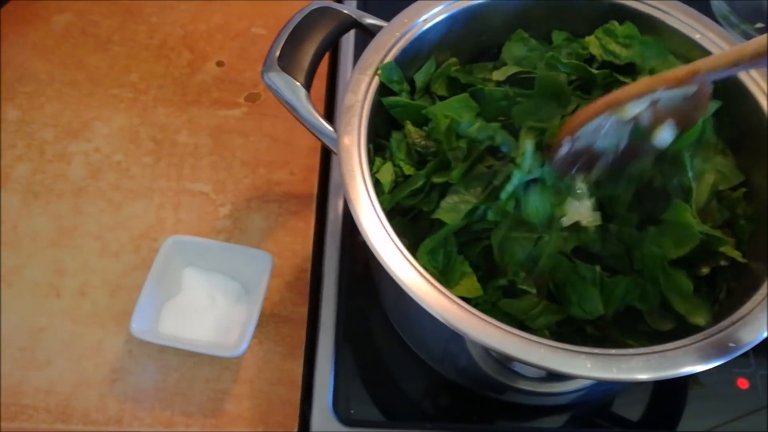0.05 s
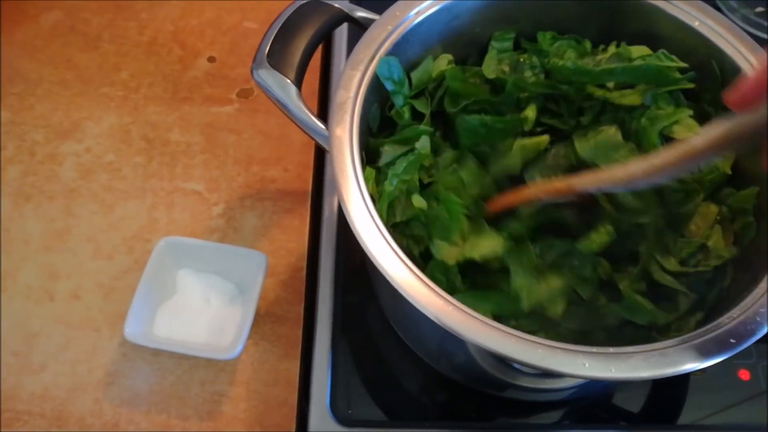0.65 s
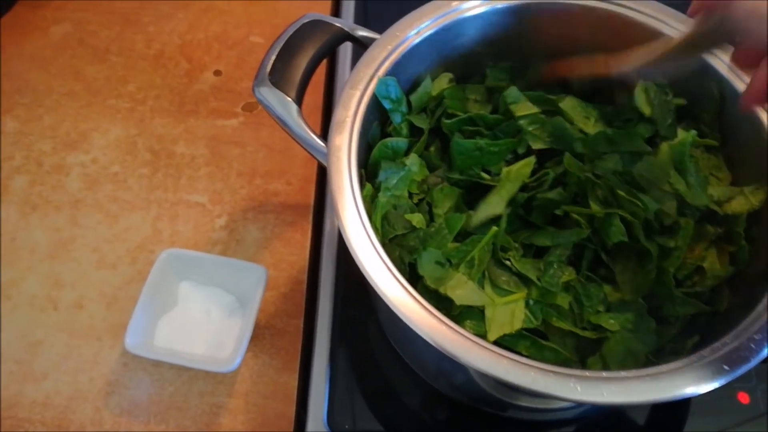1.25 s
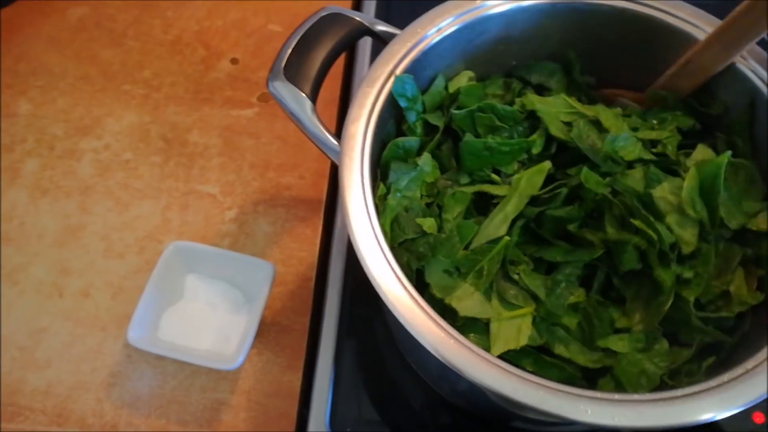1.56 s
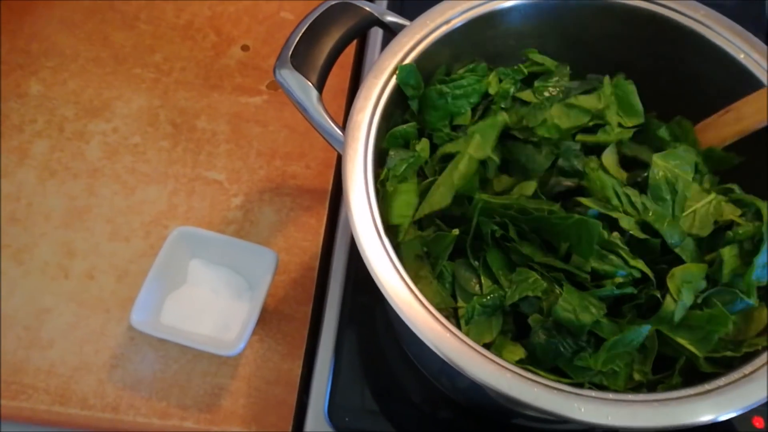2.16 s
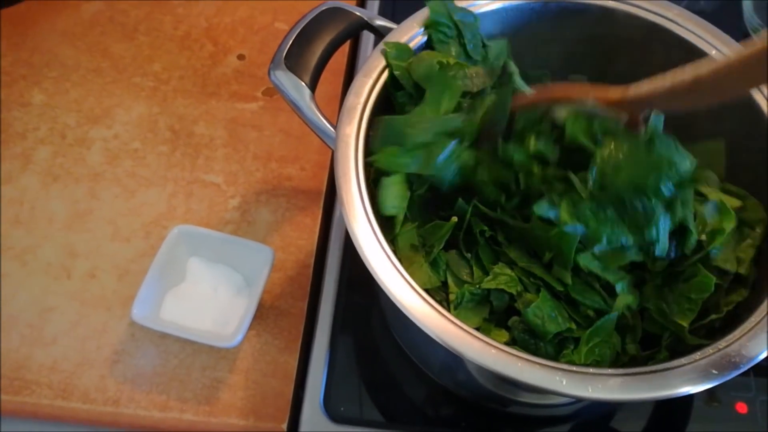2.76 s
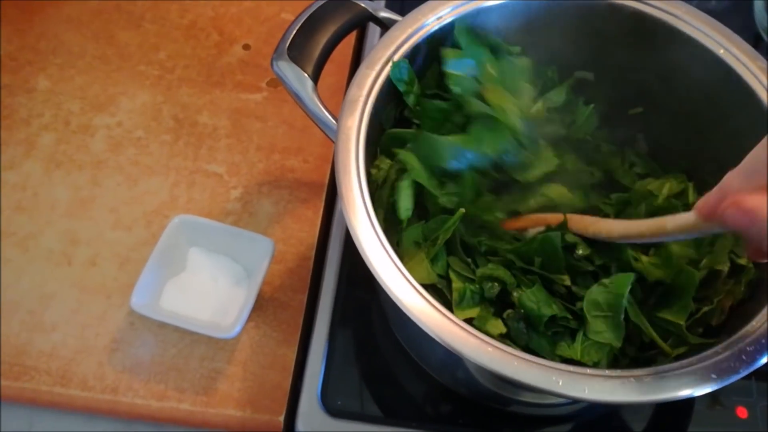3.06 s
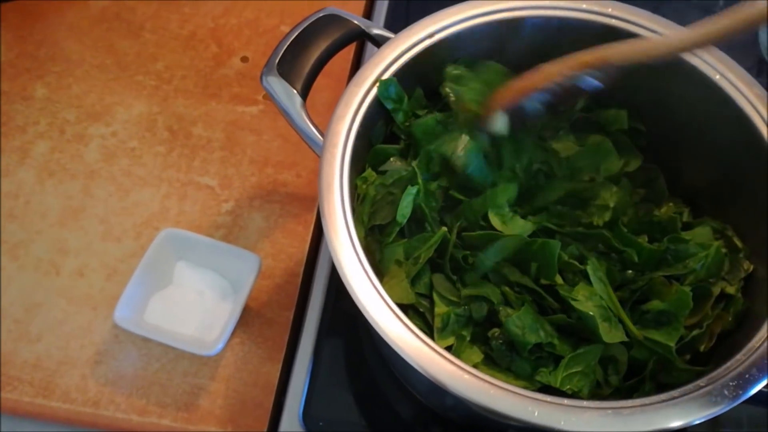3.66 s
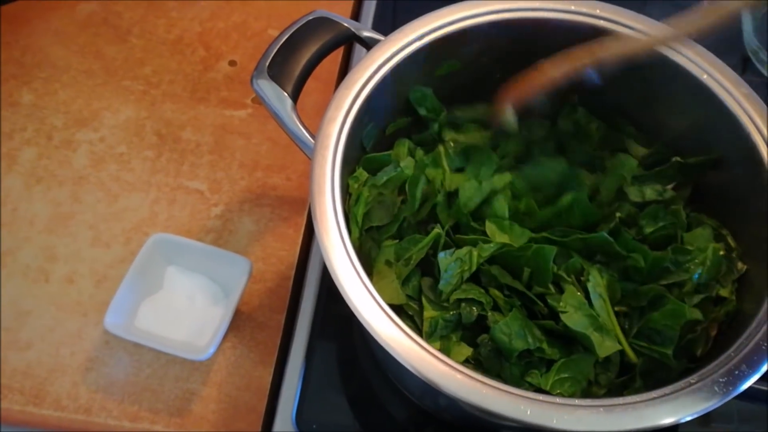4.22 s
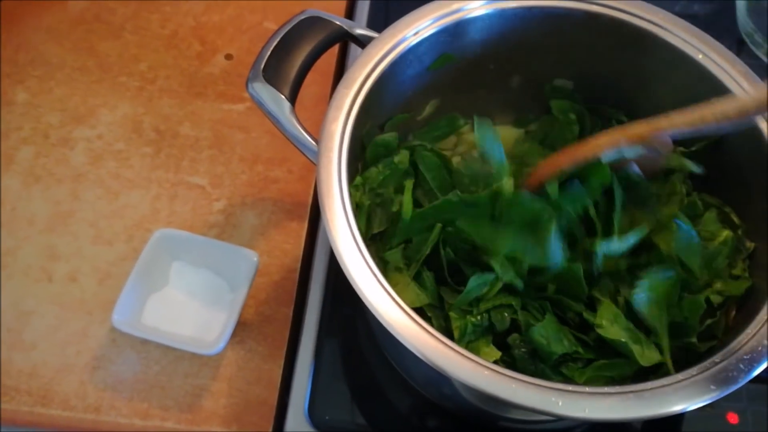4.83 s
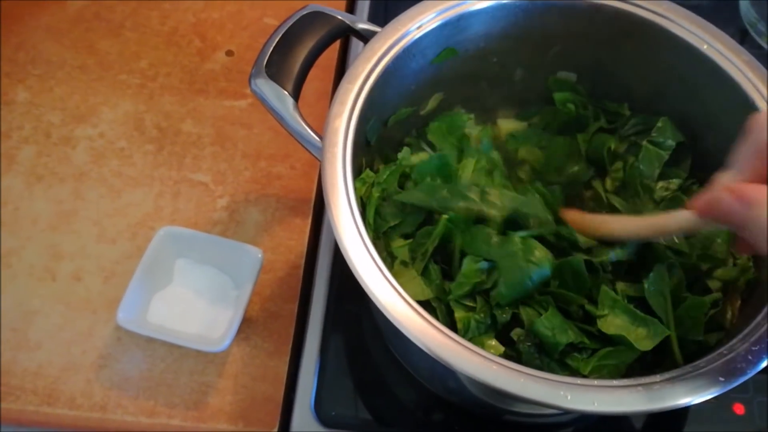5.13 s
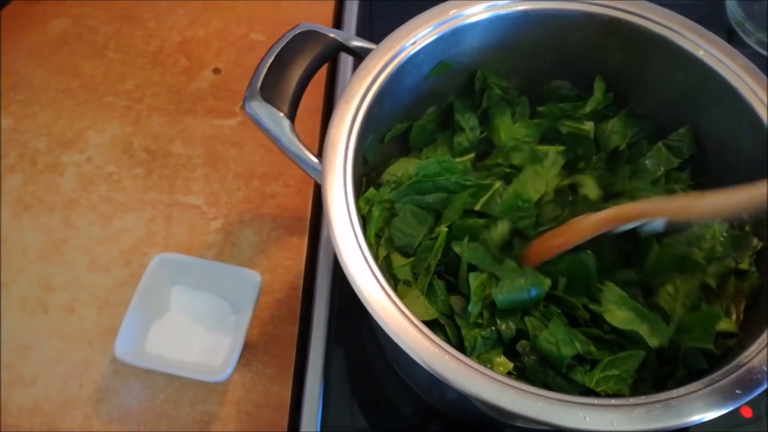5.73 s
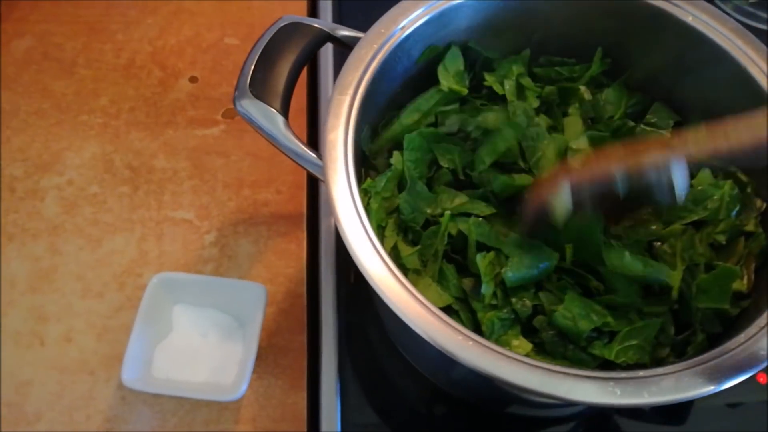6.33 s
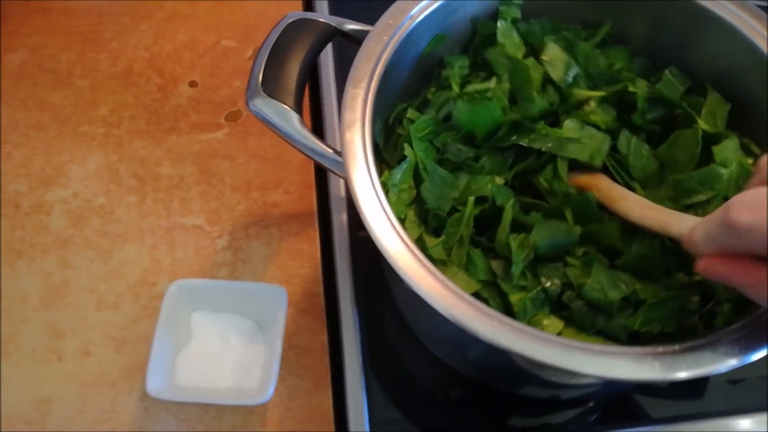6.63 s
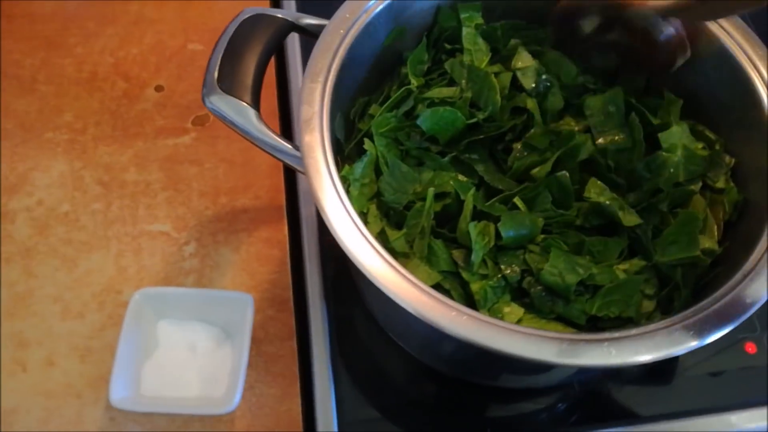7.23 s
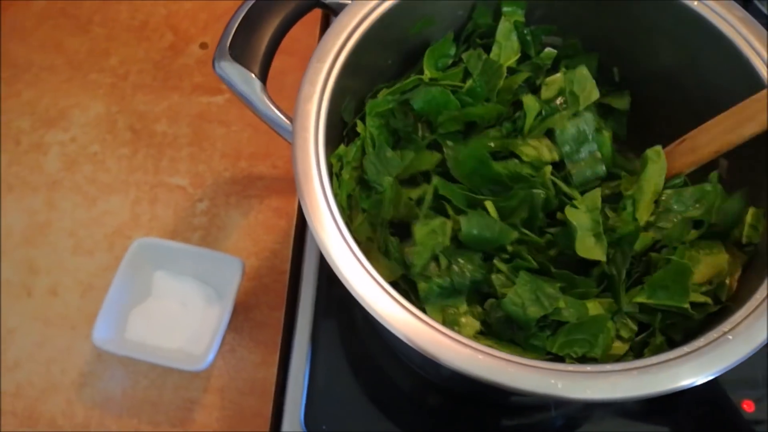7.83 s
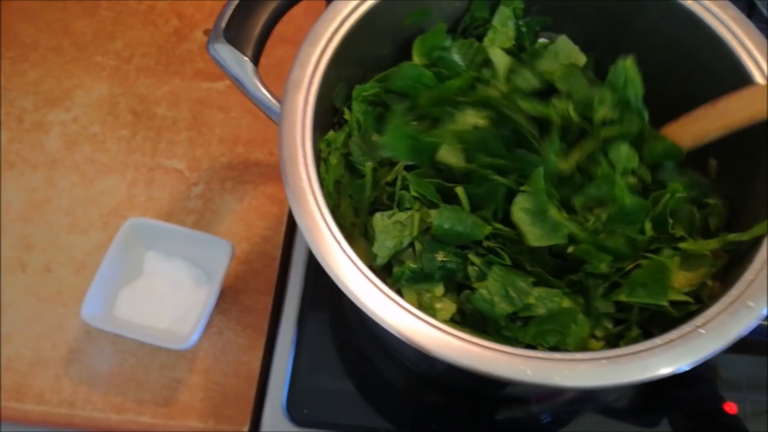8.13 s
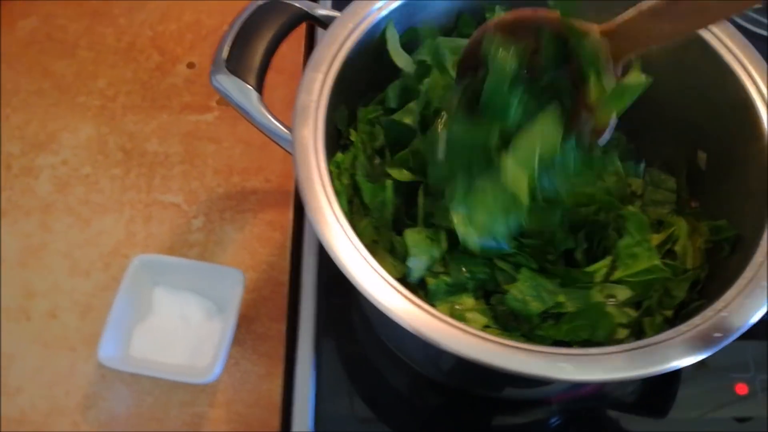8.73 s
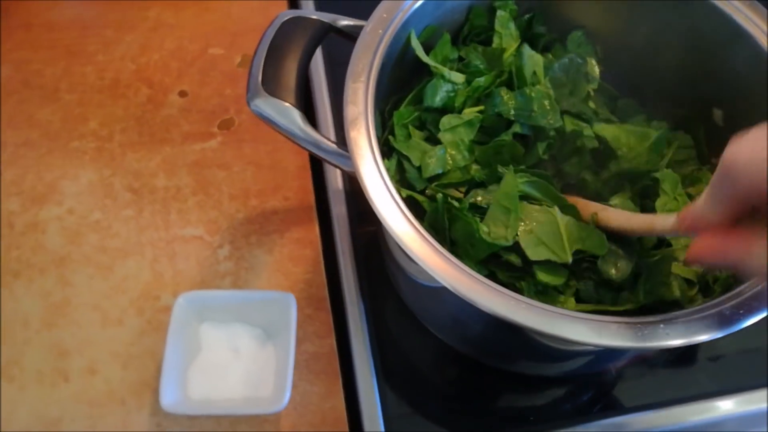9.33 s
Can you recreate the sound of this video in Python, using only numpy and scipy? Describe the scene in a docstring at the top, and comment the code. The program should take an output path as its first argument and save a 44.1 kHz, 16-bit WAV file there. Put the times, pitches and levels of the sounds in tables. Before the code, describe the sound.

Leaves rustle and crackle in a faintly sizzling metal pot as a wooden spoon turns them, with dull thuds and a sharp knock.

```python
"""A small kitchen, stereo microphone close to a steel pot on a hob; juice sizzles faintly throughout.
A wooden spoon turns chopped greens: leaves rustle, stems snap, and at 1.4 s it thuds on the bottom
through the leaves and raises a little steam. After a lull the strokes resume near 3 s, with firm thuds
at 4.4 and 6.5 s. At 7.2 s comes the sharpest of a few knocks on the bare wall; near 9 s, one last turn."""
import sys
import numpy as np
from scipy import signal
from scipy.fft import rfft, irfft, next_fast_len
from scipy.io import wavfile
from scipy.ndimage import uniform_filter1d

SR = 44100
rng = np.random.default_rng(int(sys.argv[2]) if len(sys.argv) > 2 else 0)


def output_pcm(signal):
    """Save a mono or channel-first signal as 16-bit PCM at the path in sys.argv[1].

    Samples are clipped to [-1, 1] before scaling.
    """
    pcm = np.clip(np.atleast_2d(signal).T, -1, 1) * 32767
    wavfile.write(sys.argv[1], SR, np.round(pcm).astype(np.int16))


N = 418068
TIME = np.arange(N) / SR
AGE = np.arange(SR // 2) / SR  # seconds since a contact
TOP_HZ = 15850  # upper limit of the microphone

# the loaded pot rocking on the hob: (frequency [Hz], level [dB], t60 [s])
BOTTOM_MODES = [(95.6, -10, 0.2), (126, 2, 0.077), (188.3, 3.5, 0.12), (208.6, -11.5, 0.14),
                (294.7, 2.5, 0.11), (384, 4.5, 0.055), (424, -4, 0.075), (574, -17, 0.032),
                (653, -6.5, 0.13), (740, -7, 0.053), (1030, -10, 0.035), (1030, 9, 0.042)]
# spectrum of wet leaves sliding: (frequency [Hz], level [dB])
SLIDE_SPECTRUM = [(150, -26.5), (420, 0), (630, -12.5), (1050, -1), (1500, -4), (1950, 2), (2700, -8.5),
                  (4000, -32.5)]
# spectrum of leaves crumpling: (frequency [Hz], level [dB])
CRACKLE_SPECTRUM = [(1200, -26.5), (2800, -5.5), (4000, 0), (5200, 1.5), (6900, -1), (8500, -11),
                    (11000, -14.5), (15500, -25.5)]
# likeness of left and right at the microphone: (frequency [Hz], correlation [0-1])
STEREO_LIKENESS = [(100, 0.95), (300, 0.88), (450, 0.77), (700, 0.18), (1400, 0.93), (2200, 0.022),
                   (3200, 0.085), (15000, 0.042)]


def amp(db):
    """Decibels to gain."""
    return 10 ** (np.asarray(db) / 20)


def unit(x):
    """Scale so that the centre of the stereo image has rms 1."""
    return x / np.sqrt(np.mean(x.mean(axis=0) ** 2) + 1e-20)


def unit_hit(x):
    """Scale a hit to rms 1 over its first 20 ms."""
    return x / np.sqrt(np.mean(x.mean(axis=0)[:SR // 50] ** 2) + 1e-20)


def unit_over(x, length):
    """Scale a short sound to the energy of rms 1 held for length seconds."""
    return x / np.sqrt(np.sum(x.mean(axis=0) ** 2) / (length * SR) + 1e-20)


def along(points, hz):
    """Read (Hz, value) points on a log frequency axis."""
    freqs, values = np.transpose(points)
    return np.interp(np.log(hz + 1), np.log(freqs + 1), values)


def add(track, start, hit):
    """Lay a hit into the track at start seconds."""
    part = track[:, round(start * SR):][:, :hit.shape[-1]]
    part += hit[..., :part.shape[1]]


def swell(rise):
    """A contact builds up with a time constant of rise seconds."""
    return 1 - np.exp(-AGE / rise)


def surge(peak, rise_db_per_s, fall_db_per_s):
    """A gain that climbs to 1 at peak seconds and falls away, both at a steady rate in dB."""
    drop_db = np.maximum((peak - TIME) * rise_db_per_s, (TIME - peak) * fall_db_per_s)
    return amp(-np.minimum(drop_db, 120))


def filtered(x, response):
    """Multiply the spectrum by a gain that depends on frequency."""
    size = next_fast_len(x.shape[-1] + SR // 4)
    hz = np.fft.rfftfreq(size, 1 / SR)
    return irfft(rfft(x, size) * response(hz), size)[..., :x.shape[-1]]


def coloured(x, spectrum, size=2048):
    """Minimum-phase filter with the given (Hz, dB) shape."""
    gain = amp(along(spectrum, np.fft.rfftfreq(size, 1 / SR)))
    cepstrum = irfft(np.log(gain))
    fold = 1 + np.sign(size // 2 - np.arange(size))  # nothing sounds ahead of the attack
    fold[0] = 1
    impulse = irfft(np.exp(rfft(cepstrum * fold)))
    return signal.fftconvolve(x, impulse[None], axes=1)[:, :x.shape[-1]]


def cushioned(x, cutoff_hz, order=3):
    """A soft contact passes little above its cut-off."""
    return signal.sosfilt(signal.butter(order, cutoff_hz, fs=SR, output="sos"), x)


def resonant(x, hz, q):
    """One resonance of sharpness q."""
    return signal.lfilter(*signal.iirpeak(hz, q, fs=SR), x)


def stereo_angle(hz):
    """Half the phase angle between left and right that gives their likeness, in radians."""
    return np.arccos(along(STEREO_LIKENESS, hz)) / 2


def spread(pair):
    """Two unrelated signals to left and right: alike in the bass, unrelated in the treble."""
    mid, side = filtered(pair, lambda hz: np.array([np.cos(stereo_angle(hz)), np.sin(stereo_angle(hz))]))
    return np.array([mid + side, mid - side])


def burst(t60):
    """Stereo noise that falls 60 dB in t60 seconds."""
    return spread(rng.standard_normal((2, len(AGE))) * amp(-60 * AGE / t60))


def ring(modes):
    """Struck modes at slightly new strengths; the higher ones reach left and right out of step."""
    hz, db, t60 = np.transpose(modes)[:, :, None]
    strength, direction = rng.standard_normal((2, len(modes), 1))
    skew = np.sign(direction) * stereo_angle(hz)
    fade = amp(db + 2 * strength - 60 * AGE / t60)
    return np.array([(fade * np.cos(2 * np.pi * hz * AGE + side * skew)).sum(axis=0) for side in (1, -1)])


def grains(spectrum, per_s, size_db, bed_db, patchy_db, t60=0.012):
    """Tiny pops of uneven size, each with its own colour, on a bed of countless smaller ones."""
    onsets = rng.random(N) < per_s / SR
    sizes = amp(size_db * np.minimum(rng.standard_exponential(N), 4))
    power = np.abs(signal.fftconvolve(onsets * sizes ** 2, amp(-60 * AGE / t60) ** 2)[:N])
    envelope = np.sqrt(power / power.mean() + amp(bed_db) ** 2)
    frames = signal.stft(envelope * rng.standard_normal((2, N)), nperseg=256)[2]
    patches = rng.standard_normal(frames.shape[1:])
    for axis in (0, 1):  # smooth over frequency, then time
        patches = uniform_filter1d(patches, size=4, axis=axis)
    pair = signal.istft(frames * amp(patchy_db * patches / patches.std()), nperseg=256)[1][:, :N]
    return unit(coloured(spread(pair), spectrum))


def background():
    """Low room tone of the kitchen and the hum of the electric hob."""
    # room tone: (frequency [Hz], level [dB])
    tone_spectrum = [(15, -32), (36, 10), (52, -19), (72, -2), (115, -11.5), (200, -7), (250, -8),
                     (295, -3), (330, -10), (400, -1.5), (450, 2.5), (600, -23), (900, -40)]
    # hum of the hob: (frequency [Hz], level [dB])
    hum_partials = [(117, -90.5), (295, -82.5)]
    tone = unit(coloured(spread(rng.standard_normal((2, N))), tone_spectrum, size=16384))
    hum = sum(amp(db) * np.sin(2 * np.pi * hz * TIME) for hz, db in hum_partials)
    return amp(-73) * tone + hum


def room(x):
    """The kitchen's short, diffuse reverberation."""
    # decay of the kitchen: (frequency [Hz], t60 [s])
    decay_times = [(100, 0.52), (300, 0.35), (1000, 0.49), (3000, 0.37), (7000, 0.27), (14000, 0.42)]
    out, block = np.zeros((2, N)), SR // 3
    for start in range(0, N, block):  # a fresh tail for each block
        hz, age, frames = signal.stft(rng.standard_normal((2, len(AGE))), SR, nperseg=256)
        fade = amp(-60 * age / along(decay_times, hz)[:, None])
        tail = signal.istft(frames * fade, SR, nperseg=256)[1][:, :len(AGE)]
        tail = spread(tail * swell(rise=0.0022) ** 2)
        tail /= np.linalg.norm(tail[0])
        add(out, start / SR, signal.fftconvolve(x[:, start:start + block], tail, axes=1))
    return out


def sizzle():
    """Juice simmers and spits under the leaves."""
    # course of the cooking: (time [s], relative simmer level [dB], relative frying level [dB])
    cooking = [(0, -66.5, -71), (.95, -68.5, -70), (1.9, -67, -66.5), (2.6, -68, -67), (4.8, -66, -65),
               (6.15, -66, -68), (8.1, -68.5, -67.5), (9.48, -67, -68.5)]
    # bubbling juice: (frequency [Hz], level [dB])
    simmer_spectrum = [(310, -34), (520, -4), (593, -15), (838, -3), (908, -4), (1280, -3.5), (1460, -8),
                       (1740, -0.5), (2530, -5.5), (3000, -9.5), (3900, -32), (6600, -120)]
    # spitting juice: (frequency [Hz], level [dB])
    frying_spectrum = [(1530, -28), (2600, -41), (2960, -1), (3560, -0.5), (3990, 3), (5350, 1.5),
                       (6300, -1), (10000, -21), (13000, -41), (22000, -120)]
    times, *levels = np.transpose(cooking)
    simmer_db, frying_db = (np.interp(TIME, times, db) for db in levels)
    simmer = grains(simmer_spectrum, per_s=240, size_db=1, bed_db=5, patchy_db=0.76)
    frying = grains(frying_spectrum, per_s=520, size_db=3, bed_db=4, patchy_db=1.5)
    return amp(simmer_db - 0.4) * simmer + amp(frying_db - 0.93) * frying


def steam():
    """Juice flashes to steam where the spoon bares the hot bottom, then boils off slowly."""
    # flares of steam: (peak time [s], relative flash level [dB], relative lingering level [dB])
    flares = [(1.42, -68.5, -90), (1.7, -65.5, -81), (4.58, -66, -86.5), (7.64, -70.5, -82)]
    # hiss of steam: (frequency [Hz], level [dB])
    hiss_spectrum = [(5500, -13), (8000, 2.5), (9500, 0.5), (11500, -4), (15500, -6)]
    power = amp(-89.5) ** 2  # a trace of hiss is always there
    for peak, flash_db, linger_db in flares:
        flash = amp(flash_db) * surge(peak, rise_db_per_s=105, fall_db_per_s=54)
        linger = amp(linger_db) * surge(peak, rise_db_per_s=105, fall_db_per_s=3)
        power = power + flash ** 2 + linger ** 2
    hiss = grains(hiss_spectrum, per_s=1500, size_db=2.5, bed_db=2, patchy_db=2.5)
    return amp(3) * np.sqrt(power) * hiss


def friction(response, length, per_s):
    """Uneven slips of wood on wet steel excite a response, under a push that swells fast and eases off."""
    progress = np.clip(AGE / length, 0, 1)
    push = np.sqrt(progress) * (1 - progress)
    slips = (rng.random(len(AGE)) < per_s / SR) * rng.standard_normal(len(AGE))
    return signal.fftconvolve(response, (push * slips)[None], axes=1)


def drags():
    """Dragging shudders the bottom of the pot; scraping sings in one resonance of spoon and wall."""
    # spoon along the bottom: (time [s], length [s], level [dB], cut-off [Hz])
    rubs = [(0.279, 0.31, -71, 307), (1.14, 0.24, -71.5, 220), (1.618, 0.17, -56, 345),
            (4.42, 0.067, -55, 467), (4.47, 0.29, -71.5, 130), (4.96, 0.45, -80, 486),
            (3.13, 0.13, -69, 260), (5.221, 0.15, -69, 120), (7.599, 0.2, -56, 133),
            (9.289, 0.22, -64, 209)]
    # spoon edge along the wall: (time [s], length [s], level [dB], resonance [Hz])
    scrapes = [(0.559, 0.0074, -42.5, 1076), (1.566, 0.088, -56, 895), (3.169, 0.22, -65.5, 1900),
               (3.833, 0.076, -54, 2100), (4.34, 0.082, -52, 1920), (5.78, 0.17, -67.5, 1270),
               (6.475, 0.021, -42, 964), (6.531, 0.06, -60, 1140), (7.571, 0.015, -50, 4750),
               (7.589, 0.16, -65, 2620), (7.661, 0.068, -65.5, 940), (9.147, 0.13, -60.5, 2060)]
    out = np.zeros((2, N))
    for start, length, db, cutoff_hz in rubs:
        shudder = friction(ring(BOTTOM_MODES), length, per_s=1200)
        add(out, start, amp(db) * unit_over(cushioned(shudder, cutoff_hz), length))
    for start, length, db, hz in scrapes:
        rasp = friction(burst(t60=0.017), length, per_s=700)
        singing = resonant(resonant(rasp, hz, q=4.2), hz, q=4.2)
        add(out, start, amp(db) * unit_over(singing, length))
    return out


def leaves():
    """Each stroke slides and crumples wet leaves, loudest where the spoon is fastest."""
    # spoon strokes: (fastest moment [s], rise [s], fall [s], sliding level [dB], crackling level [dB])
    strokes = [(0.315, 0.23, 0.18, -54.5, -49), (0.575, 0.22, 0.31, -57.5, -52),
               (1.275, 0.11, 0.25, -50.5, -50.5), (1.447, 0.083, 0.1, -48, -50),
               (1.625, 0.2, 0.27, -52, -48.5), (3.06, 0.31, 0.18, -56, -56), (3.26, 0.38, 0.16, -59, -85),
               (3.805, 0.089, 0.1, -55.5, -53), (3.875, 0.065, 0.46, -60, -60),
               (4.365, 0.069, .25, -50, -54), (5.025, 0.21, 0.3, -59.5, -54.5),
               (5.28, 0.2, 0.11, -58.5, -70), (5.8, .2, 0.19, -59.5, -54.5), (6.49, .2, 0.18, -56.5, -54.5),
               (9.189, 0.21, 0.084, -60, -53)]
    range_db = 25.5  # climbed in the rise time, dropped in the fall time
    slide_power, crackle_power = np.zeros((2, N))
    for peak, rise, fall, slide_db, crackle_db in strokes:
        speed = surge(peak, range_db / rise, range_db / fall)
        slide_power += (amp(slide_db) * speed) ** 2
        crackle_power += (amp(crackle_db) * speed) ** 2
    sliding = grains(SLIDE_SPECTRUM, per_s=500, size_db=1, bed_db=1, patchy_db=3.5)
    crackling = grains(CRACKLE_SPECTRUM, per_s=1700, size_db=6, bed_db=1.5, patchy_db=2)
    return np.sqrt(slide_power) * sliding + np.sqrt(crackle_power) * crackling


def snaps():
    """Single stems break with a sharp tick, each at its own pitch, that echoes briefly in the pot."""
    # snaps and light taps: (time [s], relative crack level [dB], relative body level [dB], pitch [Hz])
    stems = [(0.3383, -32.5, -47, 5400), (0.378, -37.5, -48, 5330), (0.417, -33.5, -64, 5500),
             (0.471, -43.5, -59, 5160), (0.561, -51, -39, 4840), (1.2675, -29.5, -53, 5400),
             (1.2732, -25, -44, 3800), (1.435, -25.5, -31.5, 5260), (3.187, -41.5, -47, 4830),
             (3.839, -47, -47.5, 4800), (3.8696, -43, -55.5, 5300), (4.2811, -30.5, -25, 7000),
             (4.347, -29, -35.5, 4760), (4.3551, -22.5, -32, 5030), (4.3843, -23.5, -30, 6100),
             (5.014, -32.5, -38.5, 4250), (5.097, -39, -45.5, 7300), (5.2943, -45.5, -48, 3940),
             (5.7965, -31, -58, 3470), (6.481, -37, -73, 3210), (6.565, -41, -69, 5580),
             (9.228, -42, -50, 5070)]
    out = np.zeros((2, N))
    for start, crack_db, body_db, hz in stems:
        tick = burst(t60=0.0091) + amp(-13.5) * burst(t60=0.055)
        pitched = resonant(tick, hz, q=6.2) + amp(-5.5) * tick
        crack = unit_hit(coloured(pitched, CRACKLE_SPECTRUM))
        body = unit_hit(coloured(tick, SLIDE_SPECTRUM))
        add(out, start, amp(crack_db - 18.5) * crack + amp(body_db - 16) * body)
    return out


def thuds():
    """The spoon lands on the leaves and shakes the whole pot; more leaves under it make it duller."""
    # spoon on the cushioned bottom: (time [s], level [dB], contact cut-off [Hz])
    landings = [(1.153, -57, 227), (1.4343, -27, 440), (1.478, -50, 420), (1.514, -49, 380),
                (1.564, -39.5, 218), (1.597, -41, 425), (3.187, -63, 242), (4.346, -47.5, 400),
                (4.3828, -33, 460), (6.4815, -31.5, 596), (7.391, -36, 467), (7.422, -52, 411),
                (7.577, -41, 121), (7.613, -43.5, 272), (9.2288, -43, 217), (9.257, -49, 214)]
    out = np.zeros((2, N))
    for start, db, cutoff_hz in landings:
        squash = unit_hit(resonant(burst(t60=0.085), hz=406, q=0.5))
        blow = (unit_hit(ring(BOTTOM_MODES)) + amp(-10) * squash) * swell(rise=0.001)
        add(out, start, amp(db) * unit_hit(cushioned(blow, cutoff_hz, order=4)))
    return out


def knocks():
    """Wood on bare steel: a short dense clack, with the wall and the handle ringing on."""
    # spoon on the wall: (time [s], clack [dB], contact cut-off [Hz], wall ring [dB], handle ring [dB])
    strikes = [(1.564, -40.5, 1460, -44, -51), (4.2825, -46, 2000, -41.5, -38.5),
               (7.2365, -21, 7960, -35.5, -33), (7.577, -38, 3930, -43.5, -35.5)]
    # wood meeting steel: (frequency [Hz], level [dB])
    clack_spectrum = [(100, -27), (330, -1.5), (520, -1), (620, -5.5), (1000, 2.5), (1800, -3), (2150, 3.5),
                      (2600, -0.5), (3450, 5), (4200, 2.5), (5400, -0.5), (7000, 2), (9500, -7),
                      (15000, -1)]
    # the steel wall, damped by the leaves: (frequency [Hz], level [dB], t60 [s])
    wall_modes = [(118, -10.5, 0.27), (207.4, -6.5, 0.42), (328.7, -0.5, 0.23), (644, -3.5, 0.19),
                  (927, 0.5, 0.096), (1077, -16, 0.15), (1302, -15, 0.081), (1525, -9, 0.17),
                  (2690, 3, 0.1), (2654, 6, 0.16), (2910, -6, 0.12), (3250, -8.5, 0.16), (3820, -8, 0.071),
                  (5350, -12, .07)]
    # bending of the wooden handle: (frequency [Hz], level [dB], t60 [s])
    handle_modes = [(1560, 1, 0.04), (1728, 8, 0.043), (1810, 7, 0.047), (1850, -14, 0.019),
                    (1996, 0.5, 0.07)]
    out = np.zeros((2, N))
    for start, clack_db, cutoff_hz, wall_db, handle_db in strikes:
        contact = (burst(t60=0.022) + amp(-5) * burst(t60=0.06)) * swell(rise=0.0004)
        clack = coloured(contact, clack_spectrum)
        wall = ring(wall_modes) * swell(rise=0.0027)
        handle = ring(handle_modes) * swell(rise=0.00021)
        for db, part in (clack_db, clack), (wall_db, wall), (handle_db, handle):
            add(out, start, amp(db) * unit_hit(cushioned(part, cutoff_hz)))
    return out


def scene():
    """The pot stands close by, right of the microphone, so most of its treble leans that way."""
    # balance of the pot: (frequency [Hz], left over right [dB])
    balance = [(200, -0.5), (450, 3.5), (900, -3), (1400, -3.5), (2400, -4), (4400, -8), (8000, -7),
               (15000, 6.5)]

    def placement(hz):
        """Left and right gains at constant total power."""
        gains = amp(np.outer([0.5, -0.5], along(balance, hz)))
        return gains / np.sqrt(np.mean(gains ** 2, axis=0))

    bumps, clacks, ticks = thuds() + drags(), knocks(), snaps()
    direct = bumps + clacks + ticks + leaves() + sizzle() + steam()
    reverb = room(amp(-10) * bumps + amp(-11.5) * clacks + amp(-8.5) * ticks)
    low_cut = signal.butter(2, 58, "high", fs=SR, output="sos")  # a small body radiates little deep bass
    pot = signal.sosfilt(low_cut, direct + reverb)
    return filtered(pot, placement) + background()


def record(dry):
    """The microphone passes nothing above its band limit."""
    return filtered(dry, lambda hz: hz < TOP_HZ)


dry = scene()
out = record(dry)
output_pcm(out)
```